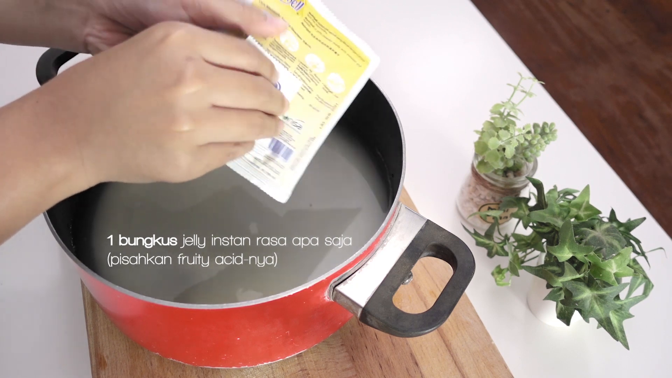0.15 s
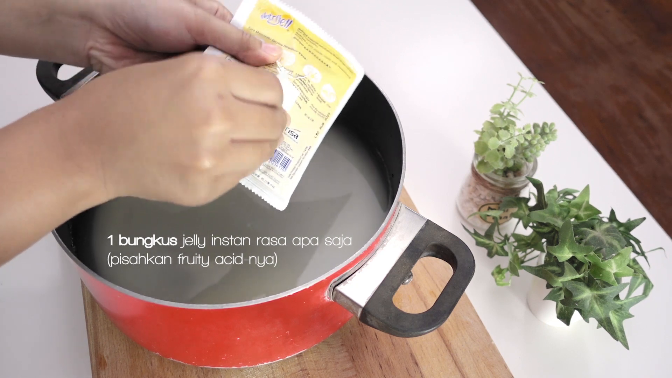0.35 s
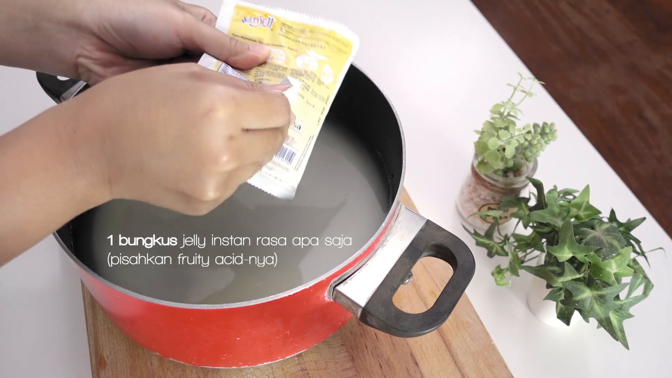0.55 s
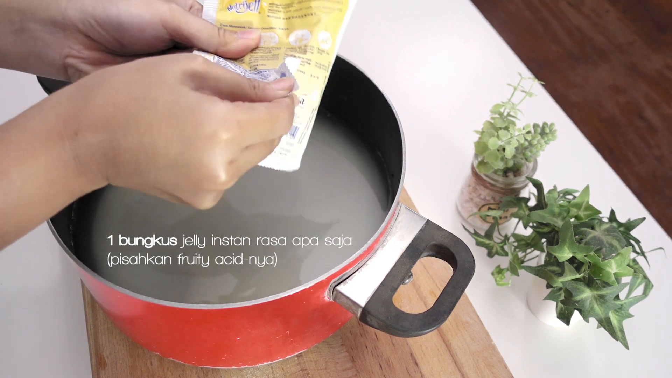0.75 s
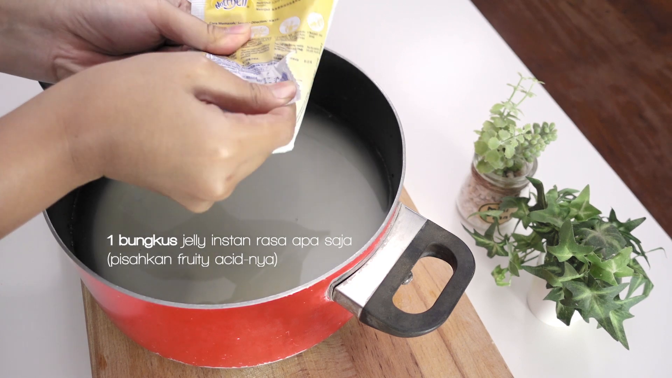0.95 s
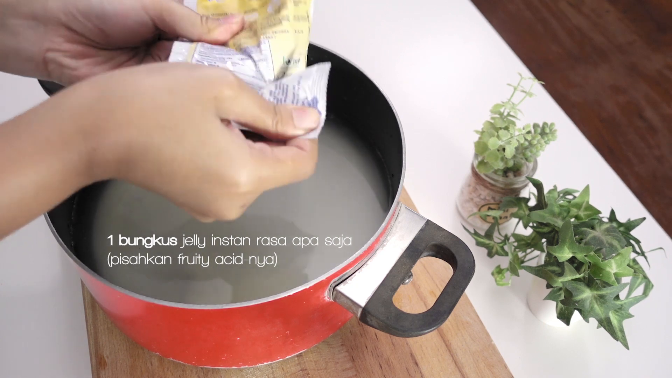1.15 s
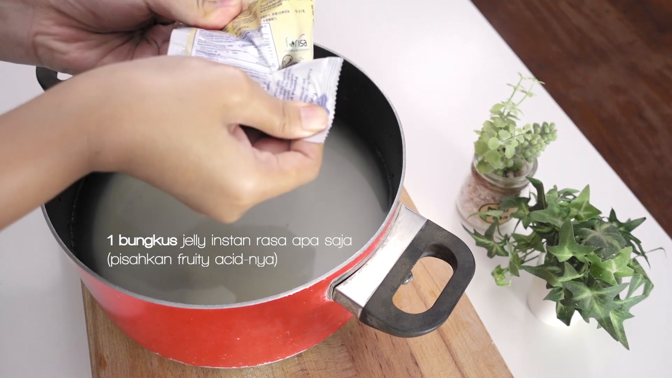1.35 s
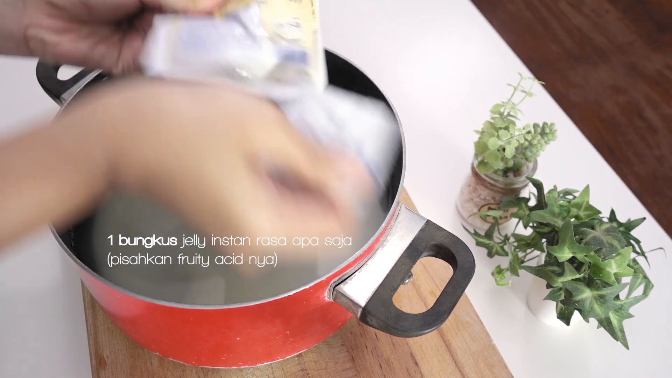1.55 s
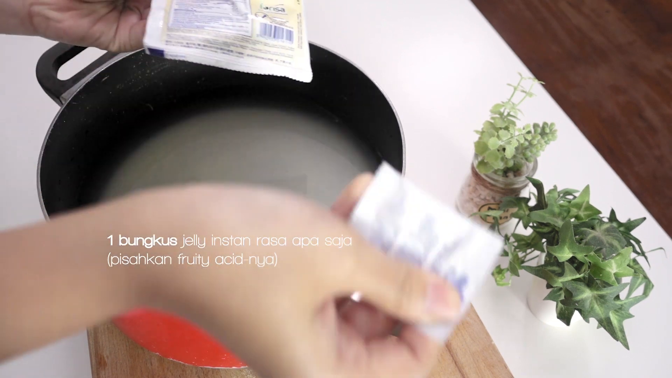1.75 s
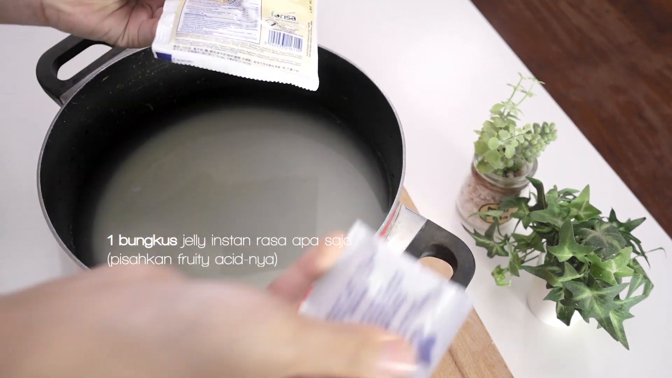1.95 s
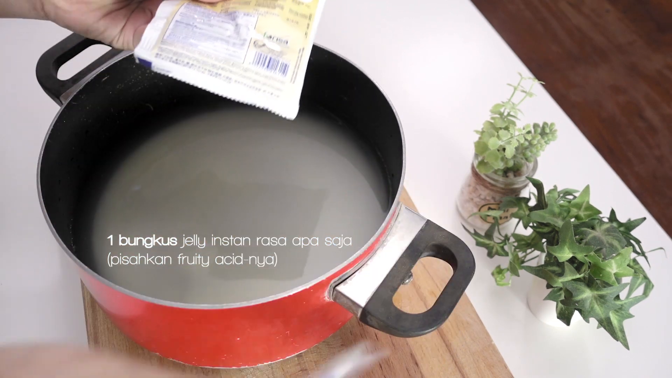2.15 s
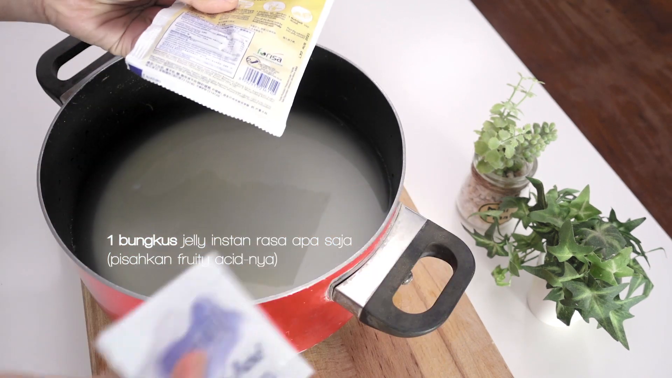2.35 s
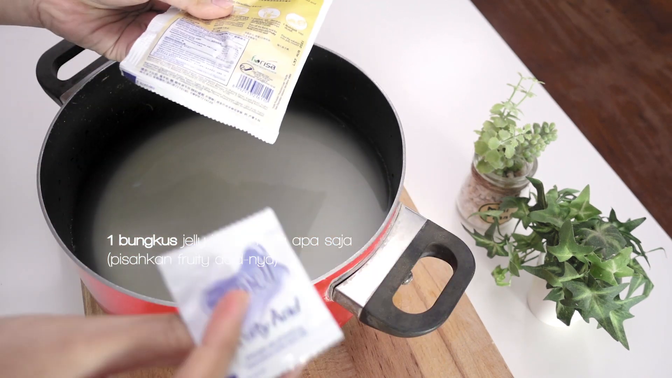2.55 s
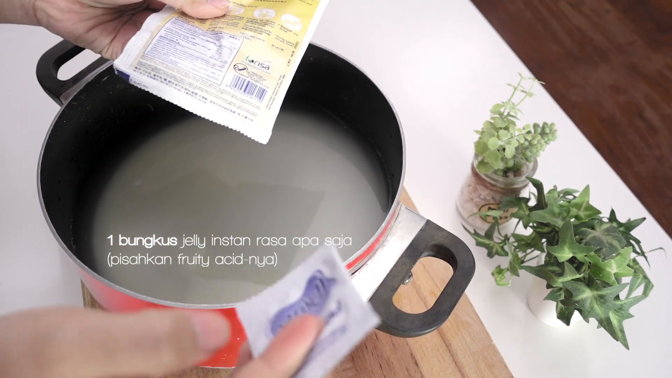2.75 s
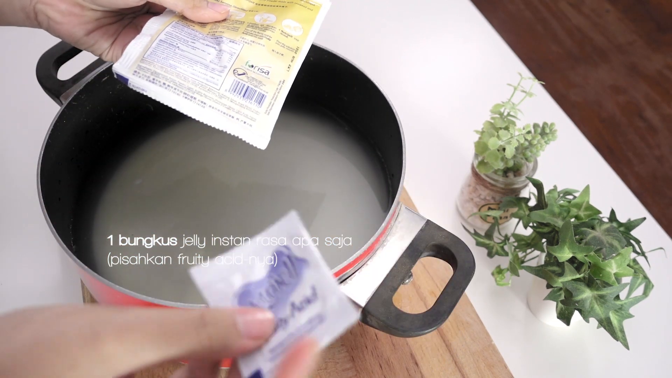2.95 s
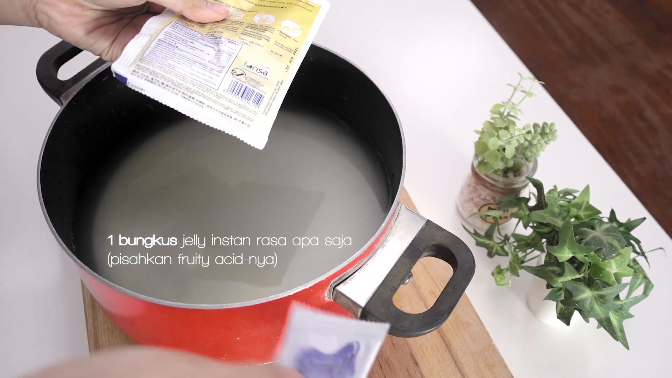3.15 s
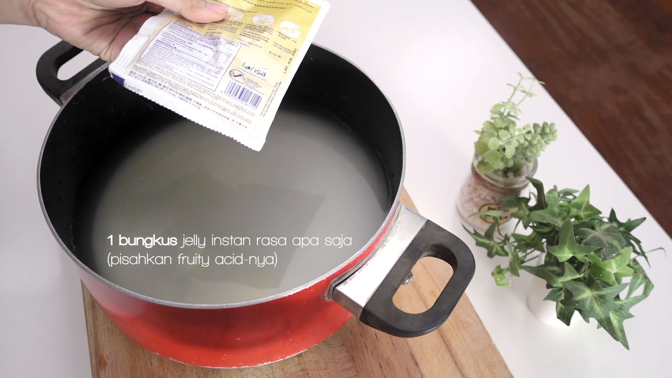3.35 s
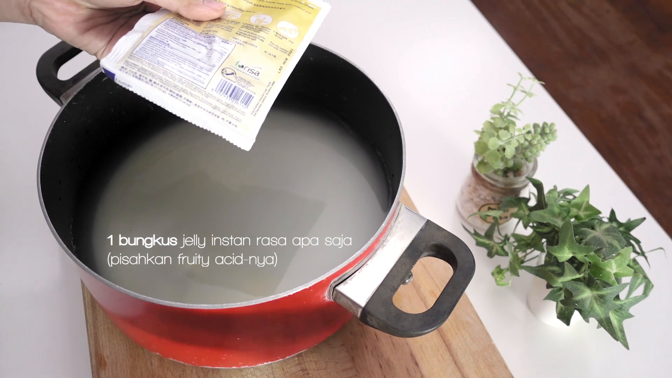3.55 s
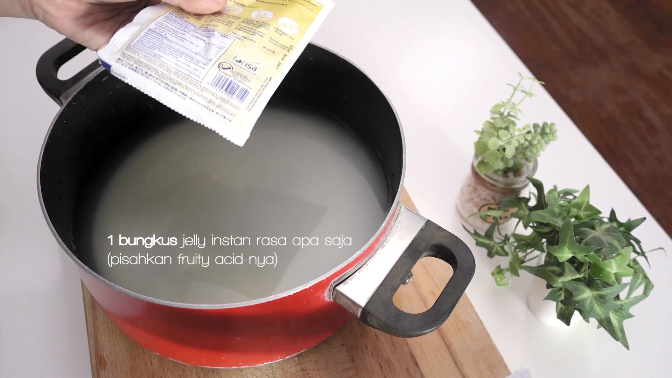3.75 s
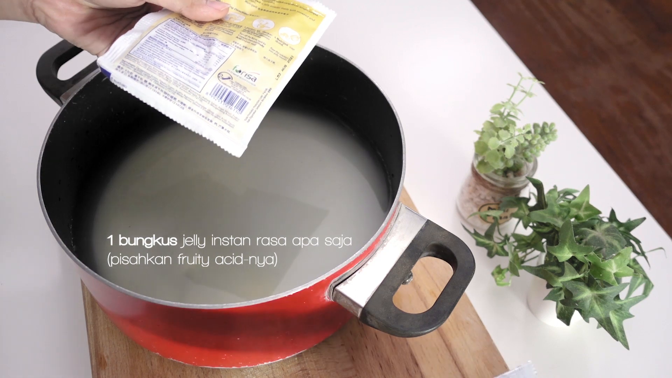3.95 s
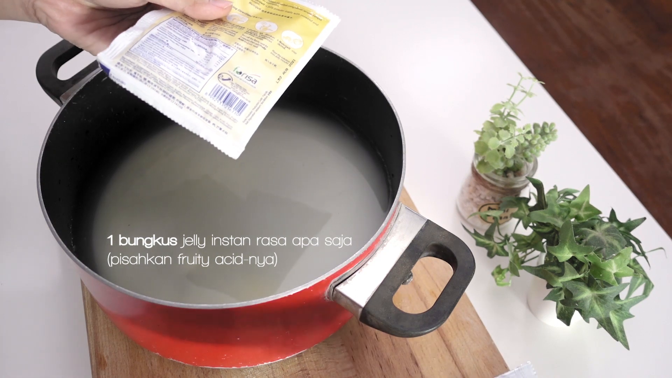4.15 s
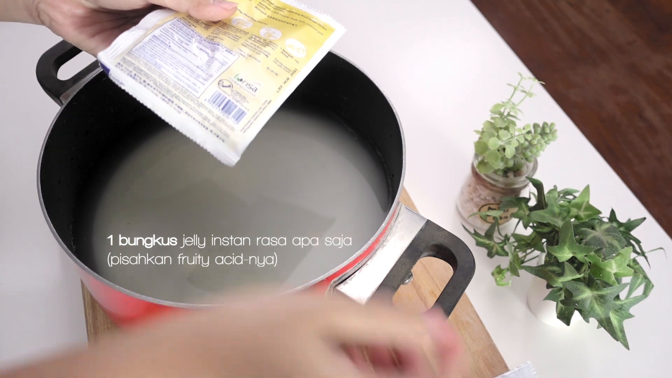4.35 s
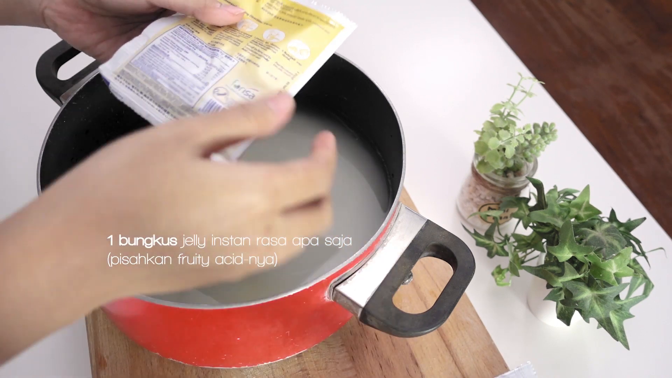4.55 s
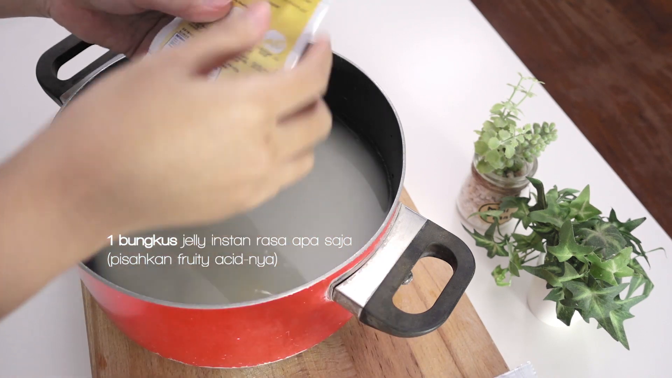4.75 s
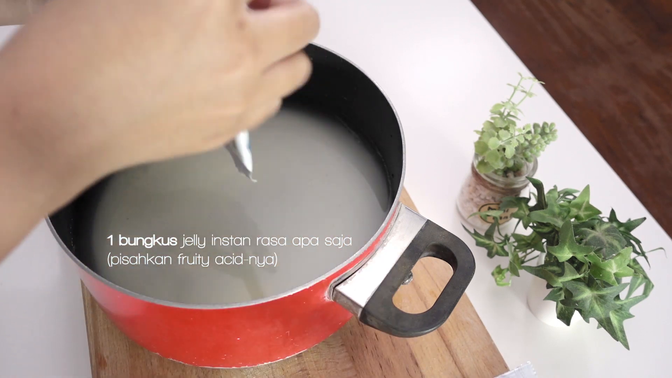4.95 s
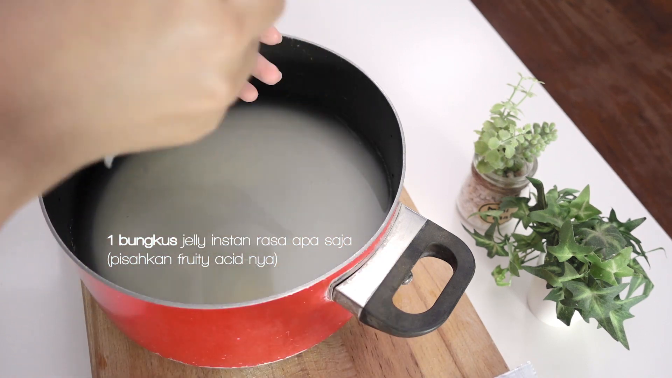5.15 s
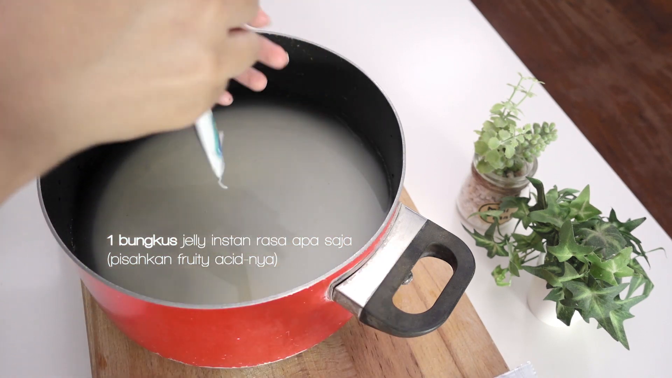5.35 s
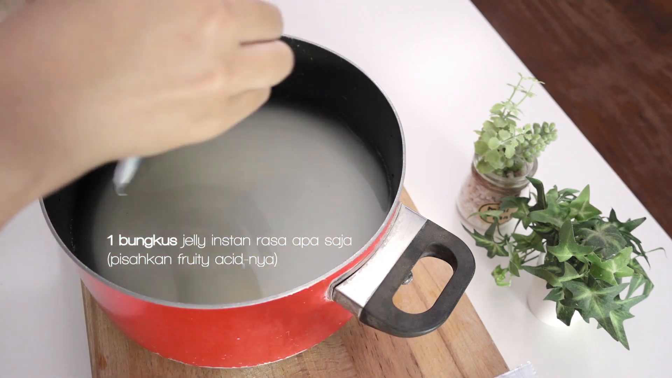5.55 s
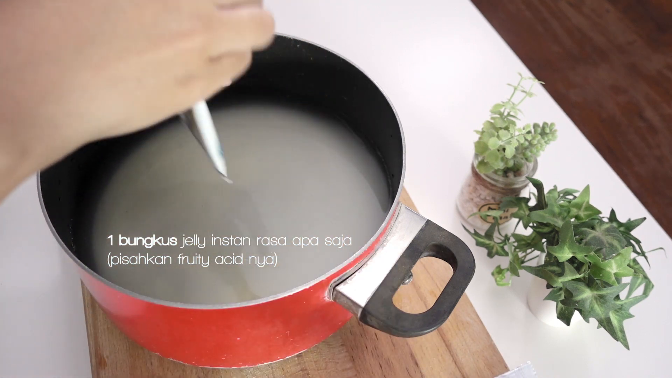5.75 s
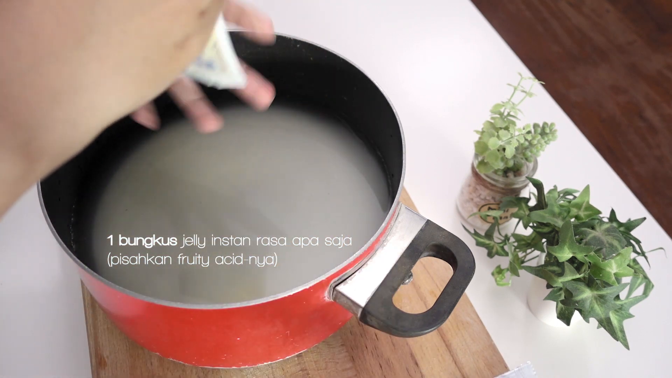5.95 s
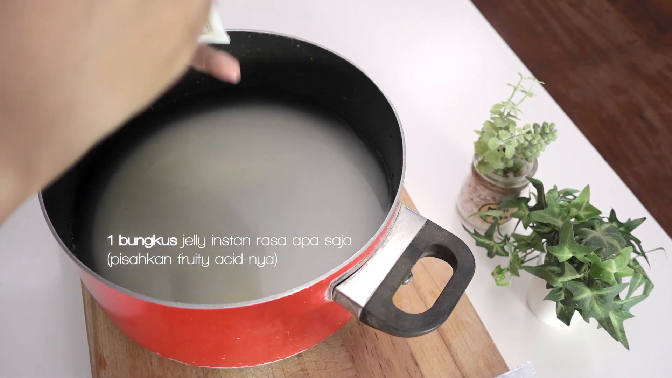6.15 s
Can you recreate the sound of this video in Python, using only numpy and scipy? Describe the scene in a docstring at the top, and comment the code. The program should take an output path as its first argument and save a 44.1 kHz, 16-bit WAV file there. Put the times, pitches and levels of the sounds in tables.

```python
"""Over room rumble and a far, low drone, a plastic sachet is pinched and crinkled close by: each buckling
crease snaps and rings briefly, and a small kitchen answers. From 1.1 s a packet is ripped off in short
tears; between them the hands bump softly, the film slides through the fingers and a faint whistle comes
and goes. After a lull the sachet is crumpled from 4.9 s as it is emptied into a pot, with one hollow
knock at 5.4 s and a last dense crackle."""
import sys
import numpy as np
from scipy import signal
from scipy.fft import rfft, irfft, next_fast_len
from scipy.io import wavfile
from scipy.ndimage import uniform_filter1d

SR = 44100
rng = np.random.default_rng(int(sys.argv[2]) if len(sys.argv) > 2 else 0)


def to_wav(sig):
    """Store sig (one row per channel, or 1-D mono) as 16-bit WAV at the path in sys.argv[1].

    Samples outside -1..1 are clipped; the rate is SR.
    """
    pcm = np.clip(np.atleast_2d(sig), -1, 1) * 32767
    pcm = np.round(pcm).astype(np.int16)
    wavfile.write(sys.argv[1], SR, pcm.T)  # frames by channels


N = 274302
TIME = np.arange(N) / SR

# spectral envelopes of the room noise, crackle, friction and tearing: f/Hz, relative level/dB
ROOM_SPECTRUM = [(15, -15), (28, 1.5), (42, 0), (80, -1.5), (105, -7), (150, -4.5), (220, -12),
                 (350, -17.5), (550, -24), (800, -22.5), (1350, -28), (1550, -27.5), (1700, -23.5),
                 (1850, -31), (2000, -32.5), (4300, -41), (16000, -54.5)]
CRACKLE_SPECTRUM = [(100, -17.5), (350, -2.5), (850, -7.5), (1300, -3), (2800, -3.5), (5000, -7.5),
                    (9000, -13.5), (16000, -23)]
FRICTION_SPECTRUM = [(200, -30.5), (1000, -22), (3000, -10), (5500, -9), (8000, -3.5), (10500, -1.5),
                     (13000, -6.5), (16000, -11.5)]
TEAR_SPECTRUM = [(60, -36), (160, -5.5), (320, -12.5), (550, -8.5), (850, -0.5), (1300, -9.5), (1900, -5),
                 (3500, -0.5), (5500, -9), (7500, -5), (11000, -3.5), (16000, -15.5)]
# course of the engine-like drone: t/s, firing rate f/Hz, overall level/dB
DRONE = [(0, 30, -63), (.1, 29.1, -45), (.45, 27.7, -49), (1.0, 25.3, -58), (1.4, 24.99, -60.5),
         (1.8, 28.26, -60.5), (2.5, 28.39, -64), (3.1, 28.27, -58), (3.4, 28.5, -52), (3.7, 30.9, -52),
         (4.1, 30.6, -54), (4.7, 29.6, -52), (5.25, 31, -59), (6.22, 31, -60.5)]
# its harmonics: order, relative level under load/dB, relative level when cruising/dB
DRONE_HARMONICS = [(1, -28.5, -8), (2, -16, -7), (3, -.5, -14.5), (4, -3, -4.5), (5, -1.5, -6.5),
                   (6, -26, -7), (8, -22.5, -17)]
# effort of the hands: t/s, relative crackle level/dB, relative rubbing level/dB
HANDLING = [(0, -58.5, -75), (.3, -50.5, -57.5), (.7, -58, -52.5), (1.08, -50.5, -46.5), (1.28, -60.5, -58),
            (1.55, -61, -47), (1.93, -67.5, -58.5), (2.25, -62, -53.5), (2.58, -85, -85.5),
            (2.85, -64, -64), (3.35, -73, -64), (4.15, -73.5, -78.5), (4.79, -74, -74.5), (4.87, -58, -63),
            (5.42, -63.5, -63.5), (5.72, -46.5, -69), (6.02, -45, -61), (6.22, -46.5, -61)]
# squeezes that set off flurries of small creases: centre t/s, duration/s, relative level/dB
SQUEEZES = [(.005, 0.034, -37), (0.258, .018, -35.5), (0.55, 0.013, -36), (1.847, 0.019, -47),
            (2.024, 0.033, -48), (2.119, 0.032, -49.5), (2.202, 0.013, -43), (2.722, 0.12, -52),
            (3.02, 0.086, -57), (3.54, .03, -62), (3.843, 0.23, -61), (5.06, 0.17, -52.5),
            (5.148, 0.15, -51.5), (5.327, 0.056, -54.5), (5.529, 0.045, -50), (5.739, 0.024, -40),
            (6.007, 0.036, -39)]
# slides of film over skin: centre t/s, duration/s, level/dB, film resonance f/Hz, gain there/dB
SLIDES = [(1.70, 0.063, -39, 10500, 2), (1.857, 0.069, -47.5, 10000, 3), (2.121, 0.053, -43.5, 11500, 0),
          (2.258, 0.043, -45.5, 11500, 0), (2.317, 0.051, -41, 12000, -6), (2.473, 0.09, -54.5, 9970, 1),
          (2.723, .08, -49.5, 10100, -9), (2.96, 0.026, -41, 10200, -6), (3.019, 0.08, -51.5, 8250, 4),
          (3.264, 0.087, -45, 11500, 0.5), (3.383, 0.048, -60, 9900, 2), (3.826, 0.16, -56, 4000, 23),
          (3.887, 0.071, -51.5, 10000, -3), (3.959, 0.037, -44.5, 10400, 6), (5.776, .04, -40, 8000, 2),
          (5.925, 0.045, -41, 10060, 0), (6.088, .033, -40, 7140, 19), (6.089, .03, -44.5, 2360, 37)]
# prominent creases: t/s, facet ring f/Hz, then low, middle and treble level/dB, each over 5 ms
SNAPS = [(0.0224, 4460, -49, -34.5, -34), (0.0545, 9100, -47, -41, -27.5), (0.0623, 6550, -45, -42.5, -36),
         (0.092, 10470, -49, -35, -29.5), (0.1295, 4000, -85, -39.5, -42), (.1866, 6450, -63.5, -47.5, -46),
         (.2075, 2130, -43, -37, -42), (0.2241, 4340, -39, -45, -42), (.245, 4900, -37, -27, -24.5),
         (0.2749, 1250, -31.5, -33, -34), (.3188, 4160, -57, -39.5, -46), (.344, 2120, -50, -42, -43),
         (.3853, 910, -30, -26, -21), (0.442, 4440, -41, -34, -40), (.4441, 1010, -38.5, -39.5, -48.5),
         (0.4608, 1040, -38.5, -33.5, -30.5), (0.4694, 1000, -36, -38, -47),
         (0.5163, 6730, -52, -41.5, -37), (.5373, 3560, -39.5, -21.5, -23), (0.64, 9200, -51, -35.5, -29.5),
         (0.7096, 9500, -52, -31, -24), (.7588, 4160, -56, -40, -42), (0.7755, 3050, -32.5, -21, -25),
         (0.8146, 2620, -35, -24, -24), (0.845, 3540, -42, -29, -37), (0.9123, 1120, -44, -35, -32.5),
         (0.9144, 2040, -32, -28, -44), (0.9567, 8600, -46.5, -33.5, -26), (.972, 2610, -57, -31.5, -37),
         (0.9829, 11800, -57, -38, -33), (1.013, 11100, -46.5, -29, -25), (1.0181, 7600, -54, -36, -28),
         (1.0325, 2720, -64, -36, -42), (1.0609, 2680, -42.5, -36, -37), (1.0712, 4100, -53, -32.5, -32),
         (1.135, 1780, -37, -20.5, -29), (1.1417, 7600, -24, -20, -18), (1.3878, 1990, -57.5, -48, -49.5),
         (1.451, 10800, -45.5, -54.5, -33.5), (1.4547, 2040, -42, -25, -41),
         (1.5184, 4370, -41.5, -32.5, -35), (1.5662, 3350, -42, -38, -29), (1.57, 5760, -47, -30, -34),
         (1.592, 8760, -34, -26, -18), (1.6016, 11270, -34.5, -43, -31), (1.613, 7900, -59, -33, -24.5),
         (1.6314, 10050, -36.5, -29, -26.5), (1.7998, 9560, -56, -47, -39), (1.814, 4630, -52, -48, -37.5),
         (1.848, 1520, -46.5, -42, -40), (1.974, 2350, -58, -44, -47.5), (2.0222, 2330, -55, -46.5, -42.5),
         (2.0453, 3270, -60, -46, -43), (2.0734, 4240, -64, -43.5, -48), (2.1834, 7500, -48, -47, -40),
         (2.2467, 10020, -52, -46, -37.5), (2.3081, 12500, -48.5, -46, -28.5),
         (2.3128, 7640, -54, -41.5, -41), (2.4555, 8800, -55, -48.5, -46), (2.6541, 2900, -59, -43, -47.5),
         (2.7089, 1550, -55, -43, -44), (2.7631, 3220, -59, -37, -35), (2.784, 313, -35.5, -39, -26.5),
         (2.8014, 9500, -60, -38.5, -31.5), (2.9122, 11500, -75, -76, -54), (3.03, 2010, -53, -49.5, -61),
         (3.069, 11690, -70, -61, -49), (3.386, 2080, -52, -53, -71), (3.778, 8700, -55, -48, -44.5),
         (3.833, 11180, -72, -37.5, -35), (3.9405, 10400, -70, -47.5, -39),
         (3.9874, 10400, -61, -45, -37.5), (4.1378, 1930, -57, -52, -73), (4.2439, 4300, -76.5, -59.5, -58),
         (4.4599, 1047, -60.5, -58.5, -64), (4.7029, 12100, -63, -66, -57.5),
         (4.7566, 11700, -75, -58, -54.5), (4.82, 11180, -79, -57, -49.5), (4.8771, 1650, -51.5, -39, -40),
         (4.9236, 1390, -48, -43, -48.5), (5.027, 1540, -51, -41.5, -58), (5.056, 1580, -45.5, -39, -50),
         (5.0667, 3400, -49.5, -47, -52), (5.1345, 9000, -68, -46, -44), (5.1446, 6660, -62, -57, -42),
         (5.1567, 3220, -66, -42, -56), (5.2132, 3500, -75, -41.5, -43.5), (5.295, 3430, -47, -41.5, -40),
         (5.2999, 4970, -58, -40, -38.5), (5.4058, 1591, -40, -42, -55), (5.4327, 1530, -43.5, -41.5, -44),
         (5.458, 3060, -57, -42.5, -50), (5.5018, 9140, -46, -52, -40.5), (5.5825, 9050, -47, -36, -32),
         (5.6132, 3350, -50, -32.5, -54), (5.6167, 8530, -48, -43, -27.5), (5.6532, 5036, -50, -40, -40),
         (5.676, 9400, -53, -34.5, -33.5), (5.689, 9700, -59, -41, -35), (5.7613, 10900, -48, -40, -30.5),
         (5.779, 8790, -48, -38, -36), (5.838, 3710, -53.5, -29.5, -25), (5.854, 5790, -66, -37, -36),
         (5.8828, 10310, -47, -37, -33.5), (5.8935, 5130, -52, -33, -30.5), (5.9211, 7990, -50, -37.5, -29),
         (5.9662, 8150, -60, -42, -35), (5.9965, 2760, -47, -30.5, -30), (6.009, 9860, -51, -33.5, -28),
         (6.0156, 8280, -48, -31.5, -22.5), (6.1051, 2900, -55, -32, -37), (6.156, 384, -42.5, -42, -42.5)]
# edges of those three bands: f/Hz
BAND_EDGES_HZ = (250, 1400, 5500, 16000)
# tears along the seam: start t/s, end t/s, level/dB, treble tilt/dB, sheet resonance f/Hz
TEARS = [(1.1235, 1.132, -41, 5.5, 1870), (1.129, 1.15, -28, -2.5, 1860), (1.147, 1.155, -29, 3, 930),
         (1.575, 1.588, -36.5, -1, 4320), (1.586, 1.609, -29, 3, 2070), (1.614, 1.643, -36.5, -8, 434),
         (2.756, 2.783, -43, 3, 7260), (2.783, 2.798, -37.5, 6, 328)]
# soft bumps of the hands: centre t/s, f/Hz, level/dB
BUMPS = [(1.24, 74, -47.5), (1.758, 80, -45), (3.349, 50, -46), (6.069, 92, -51.5)]
# modes of the hollow knock: f/Hz, relative level/dB
KNOCK_MODES = [(345, -10), (415, 3.5), (510, -6)]


def undb(db):
    """Amplitude ratio of a level in decibels."""
    return 10 ** (np.asarray(db) / 20)


def unit(x):
    """Normalisation to an rms of 1."""
    return x / np.sqrt(np.mean(x ** 2) + 1e-18)


def curves(table):
    """Linear interpolation in time of each column after the first."""
    s, *columns = np.transpose(table)
    return [np.interp(TIME, s, c) for c in columns]


def add(out, s, x):
    """Superposition of x on out, starting at s seconds."""
    i = int(np.clip(round(s * SR), 0, N - 1))
    out[i:i + len(x)] += x[:N - i]


def colour(x, points):
    """Minimum-phase filtering through (f/Hz, gain/dB) points: causality keeps attacks sharp."""
    size = 2 * next_fast_len(len(x) // 2 + 256)
    hz, db = np.transpose(points)
    f = np.arange(size // 2 + 1) * SR / size
    gain = undb(np.interp(np.log(f + 1), np.log(hz), db))
    cepstrum = irfft(np.log(gain))
    cepstrum[1:size // 2] *= 2
    cepstrum[size // 2 + 1:] = 0
    return irfft(rfft(x, size) * np.exp(rfft(cepstrum)))[:len(x)]


def resonance(x, hz, gain_db, width):
    """Resonant peak, or a dip for negative gain, reaching a factor 1 + width to either side of hz."""
    return colour(x, [(hz / (1 + width), 0), (hz, gain_db), (hz * (1 + width), 0)])


def walk(rate):
    """Low-pass random fluctuation of rms 1, with rate new values a second."""
    step = int(SR / rate)
    held = np.repeat(rng.standard_normal(N // step + 1), step)
    return unit(uniform_filter1d(held, step)[:N])


def grains(count, rate, spread_db):
    """Shot noise: random impulses, a few much larger than the rest."""
    hits = (rng.random(count) < rate / SR) * rng.choice([-1, 1], count)
    return unit(hits * undb(spread_db * np.minimum(rng.exponential(size=count), 3)))


def room_tone(db=-55):
    """Ambient noise: rumble and faint hiss under a slight, slow amplitude modulation."""
    sway_db = 1.2 * walk(3)
    return unit(colour(rng.standard_normal(N), ROOM_SPECTRUM)) * undb(db + sway_db)


def drone(change_s=3.36, change_length_s=0.29, flutter_db=2.5):
    """Harmonic series: walls transmit only the lowest orders, whose balance shifts as the load eases."""
    hz, db = curves(DRONE)
    phase = 2 * np.pi * np.cumsum(hz * (1 + .004 * walk(12))) / SR
    cruising = .5 + .5 * np.tanh((TIME - change_s) / change_length_s)
    out = np.zeros(N)
    for order, load_db, cruise_db in DRONE_HARMONICS:
        harmonic = np.sin(round(order) * phase + rng.uniform(0, 2 * np.pi) + 0.54 * walk(11))
        out += harmonic * undb(load_db + (cruise_db - load_db) * cruising + flutter_db * walk(6.3))
    return np.sqrt(2) * out * undb(db)


def squeezed(handling_db):
    """Incoherent addition: the power of each squeeze adds to that of the handling; the sum is in dB."""
    power = undb(handling_db) ** 2
    for s, length, db in SQUEEZES:
        power += (undb(db) * np.exp(-(2 * (TIME - s) / length) ** 2)) ** 2
    return 10 * np.log10(power)


def buckle(ring_hz, ring=0.81, flutter_s=0.0017, shiver_s=.0035, decay_cycles=2.6):
    """Snap-through buckling: a crease flips, giving bending waves, a damped facet tone and a click."""
    t = np.arange(1024) / SR
    x = rng.standard_normal(len(t)) * (np.exp(-t / flutter_s) + .07 * np.exp(-t / shiver_s))
    x += ring * np.sin(2 * np.pi * ring_hz * t) * np.exp(-t * (ring_hz / decay_cycles + 200))
    x[:2] += 2.6 * np.array([2, -1])  # the click
    return x


def crackle(db, rate=260, centre_hz=2700, spread_db=4):
    """Crackling noise: small creases buckle with power-law sizes, over a bed of finer ones."""
    creases = np.zeros(N)
    for when, size, pitch in rng.random((int(rate * N / SR), 3)):
        ring_hz = centre_hz * np.exp(1.2 * (2 * pitch - 1))
        gain = undb(-spread_db * np.log(size + 0.032))
        add(creases, when * N / SR, buckle(ring_hz, ring=1.0) * gain)
    bed = undb(-5) * grains(N, rate=3300, spread_db=7.0)
    return unit(colour(unit(creases) + bed, CRACKLE_SPECTRUM)) * undb(db - 4)


def ticks(db, rate=70, centre_hz=3600, size_db=2, tilt_db=7):
    """Random point process: middling creases flip independently, duller or brighter each time."""
    out = np.zeros(N)
    for when, size, tilt, pitch in rng.uniform(-1, 1, (int(rate * N / SR), 4)):
        ring_hz = min(centre_hz * np.exp(1.6 * pitch), SR / 4)
        treble = [(8000, tilt * tilt_db - 5), (16000, tilt * tilt_db - 9)]
        x = colour(buckle(ring_hz), [(100, -20.5), (400, -6.5), (1000, -3.5), (3000, -0.5)] + treble)
        add(out, (when + 1) / 2 * N / SR, unit(x) * undb(size_db * size))
    return unit(out) * undb(db - 0.5)


def friction(grip_db):
    """Stick-slip friction of film on skin and on itself: dense grains, unsteady grip, tiny catches."""
    grip = undb(grip_db * walk(110))
    catches = .25 * grip_db * grains(N, rate=130, spread_db=4)
    slips = grains(N, rate=6000, spread_db=5) * grip
    return unit(colour(slips + catches, FRICTION_SPECTRUM))


def sliding(rub_db):
    """Frictional excitation: a light rub throughout, and brighter swishes coloured by the taut film."""
    out = colour(friction(grip_db=2), [(9000, 0), (14000, -2)]) * undb(rub_db - 1)
    bright_rub = colour(friction(grip_db=3.5), [(8000, 0), (14000, 4)])
    for s, length, db, hz, gain_db in SLIDES:
        near = abs(TIME - s) < length * 1.2
        swish = resonance(bright_rub[near], hz, gain_db, width=.2)
        out[near] += unit(swish) * undb(db) * np.exp(-(2 * (TIME[near] - s) / length) ** 2)
    return out


def kitchen(x, t60_s=0.37, tail_db=-14.5, early_db=-22, early_s=.0095):
    """Reflection: pot and worktop scatter an early echo, and the walls add a short reverberation."""
    t = np.arange(SR // 2) / SR
    tail = rng.standard_normal(len(t)) * np.exp(-np.log(1000) * t / t60_s) * (1 - np.exp(-t / .004))
    tail = colour(tail, [(150, 9.0), (800, -3.5), (1700, -2.5), (3000, -1.5), (7000, 0), (16000, 0.5)])
    early = rng.standard_normal(len(t)) * (t > early_s) * np.exp(-abs(t - early_s) / 0.0013)
    early = colour(early, [(800, -0.5), (4000, 2.5), (16000, -6.5)])
    response = (undb(tail_db) * unit(tail) + undb(early_db) * unit(early)) / np.sqrt(len(t))
    return x + signal.fftconvolve(x, response)[:N]


def snaps(creep_db=-17, creep_s=0.0016, window_s=.005):
    """Release of elastic energy: each prominent crease creeps for a moment, then buckles."""
    out, edges = np.zeros(N), np.array(BAND_EDGES_HZ)
    centres = np.sqrt(edges[:-1] * edges[1:])
    lead = np.arange(-192, 0) / SR
    for s, ring_hz, *bands_db in SNAPS:
        creep = rng.standard_normal(len(lead)) * np.exp(lead / creep_s)
        creep *= undb(creep_db + 5 * rng.standard_normal())
        x = colour(np.r_[creep, buckle(ring_hz)],
                   [(70, -15), (280, -9.5), (550, -0.5), (900, 4), (1300, -1.0), (2700, 3.5),
                    (5200, 1), (9000, 0.5), (13000, -2.5), (16000, -11.5)])
        # the size of the flipping facet sets the weight of each band
        for _ in range(2):
            power = 2 * abs(rfft(x)) ** 2 / (len(x) * window_s * SR)
            band_power = np.histogram(np.arange(len(power)) * SR / len(x), edges, weights=power)[0]
            gain_db = np.array(bands_db) - 10 * np.log10(band_power)
            x = colour(x, np.c_[centres, gain_db])
        add(out, s + lead[0], x)
    return out


def tears():
    """Crack propagation: the seam yields in a rush of tiny fractures that excite the stretched sheet."""
    out = np.zeros(N)
    for start, end, db, tilt_db, hz in TEARS:
        count = max(int((end - start) * SR), 64)
        fractures = np.pad(grains(count, rate=3500, spread_db=5.5), (0, 512))
        rip = colour(colour(fractures, TEAR_SPECTRUM), [(2000, 0.011), (8000, tilt_db)])
        rip = resonance(rip, hz, gain_db=8, width=0.36)
        add(out, start, unit(rip) * np.sqrt(len(rip) / count) * undb(db))
    return out


def bumps(half_width_s=0.051):
    """Gaussian tone pulses: the shifting hands give low thuds, dull for want of a sharp attack."""
    return sum(undb(db) * np.sin(2 * np.pi * hz * (TIME - s)) * np.exp(-((TIME - s) / half_width_s) ** 2)
               for s, hz, db in BUMPS)


def whistle(hz=6270, width_hz=70):
    """Narrow-band noise, heard as a thin, faint whistle that swells and fades."""
    db, = curves([(1.2, -90), (1.4, -73), (1.95, -67), (2.4, -64), (2.62, -71), (2.75, -95)])
    phase = 2 * np.pi * hz * TIME
    return (walk(width_hz * 2) * np.sin(phase) + walk(width_hz * 2) * np.cos(phase)) * undb(db)


def knock(s=5.406, db=-41.0, t60_s=0.078):
    """Free vibration of three damped modes: a light, hollow knock as the sachet is emptied."""
    t = np.maximum(TIME - s, 0)
    modes = sum(undb(mode_db) * np.sin(2 * np.pi * hz * t) for hz, mode_db in KNOCK_MODES)
    return undb(db) * modes * np.exp(-np.log(1000) * t / t60_s)


def scene():
    """Superposition of the background, the sachet with its reflections, the bumps and the whistle."""
    background = room_tone() + drone()
    handling_db, rub_db = curves(HANDLING)
    crease_db = squeezed(handling_db)
    sachet = crackle(crease_db) + ticks(crease_db) + sliding(rub_db) + snaps() + tears() + knock()
    return (background + kitchen(sachet) + bumps() + whistle())[None]


def record(dry):
    """Band limiting: a steep elliptic low-pass cuts the treble above 15.8 kHz."""
    return signal.sosfilt(signal.ellip(10, .2, 70, 15800, fs=SR, output="sos"), dry)


dry = scene()
out = record(dry)
to_wav(out)
```